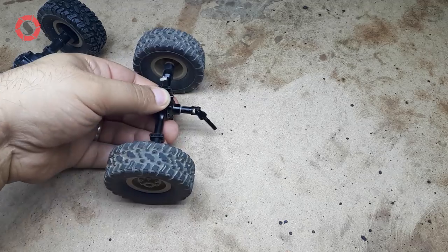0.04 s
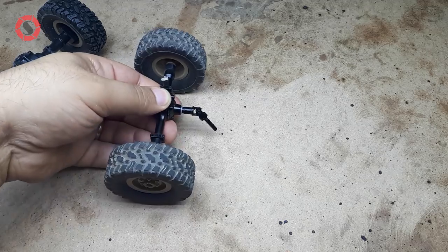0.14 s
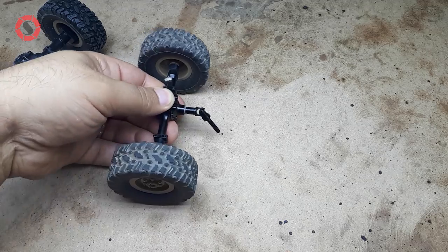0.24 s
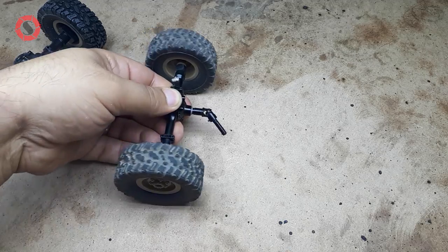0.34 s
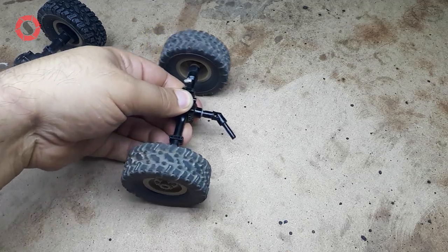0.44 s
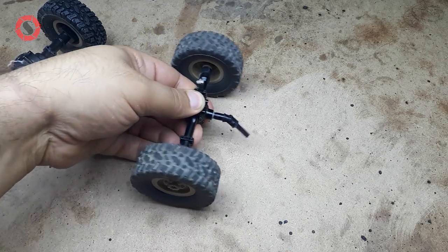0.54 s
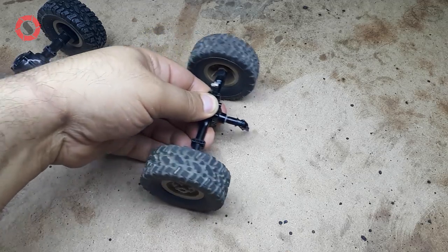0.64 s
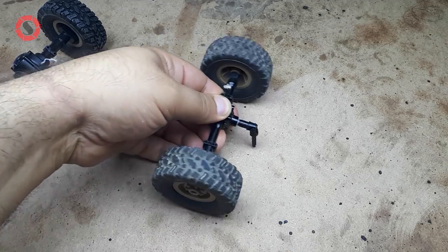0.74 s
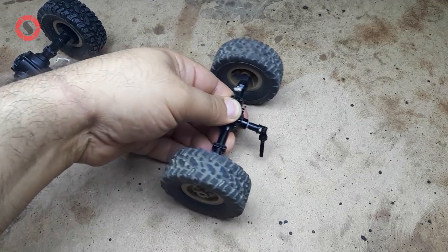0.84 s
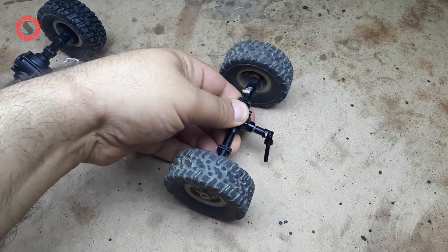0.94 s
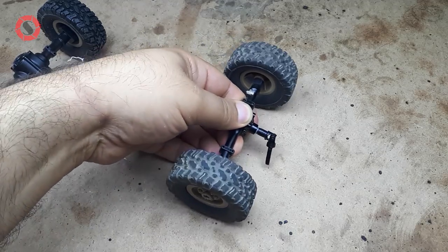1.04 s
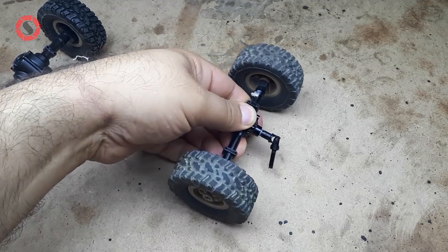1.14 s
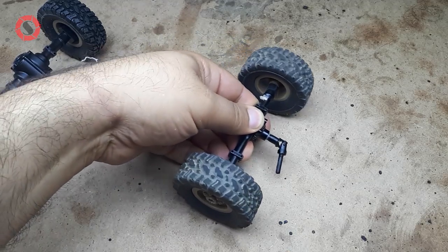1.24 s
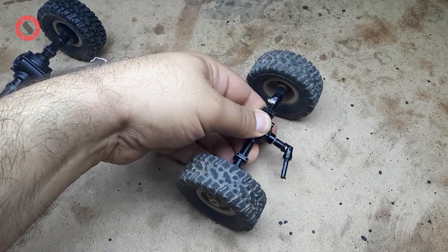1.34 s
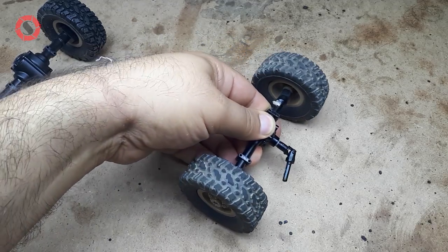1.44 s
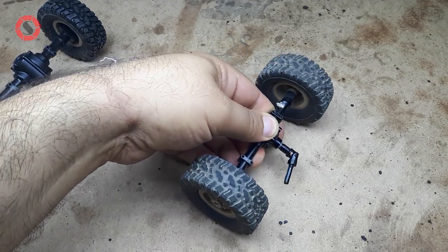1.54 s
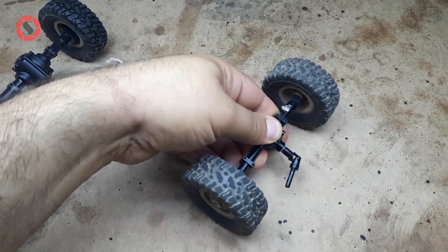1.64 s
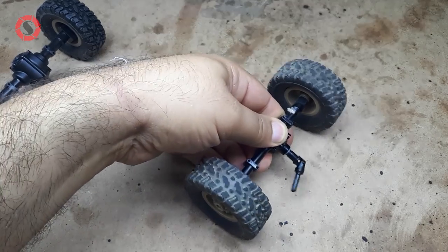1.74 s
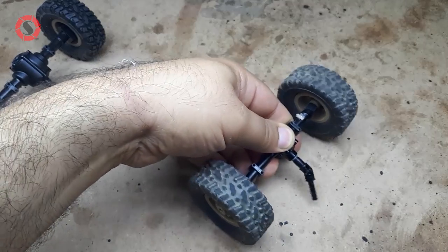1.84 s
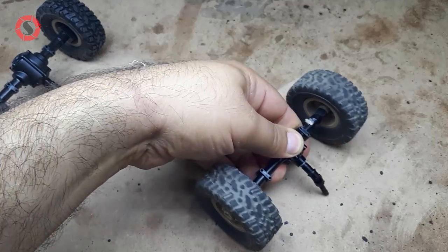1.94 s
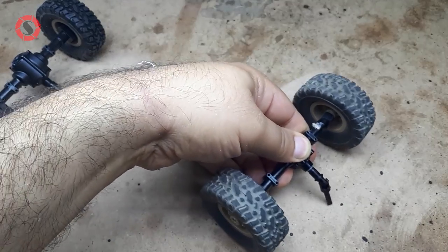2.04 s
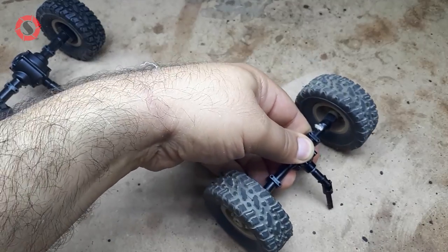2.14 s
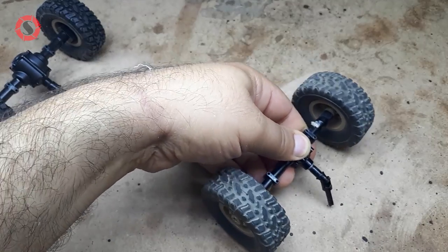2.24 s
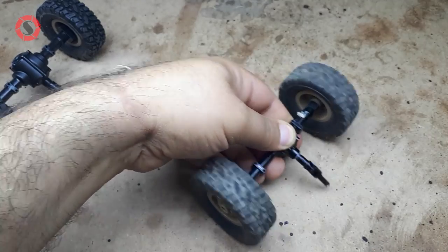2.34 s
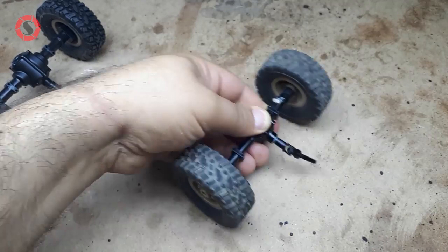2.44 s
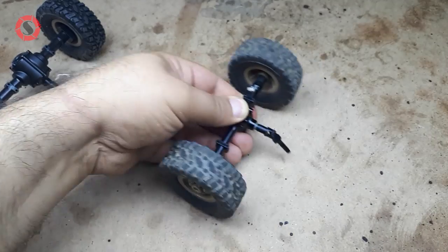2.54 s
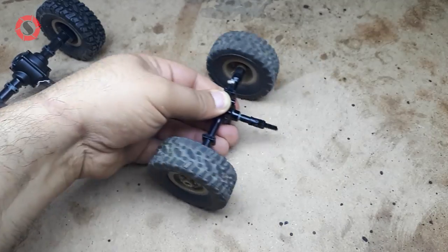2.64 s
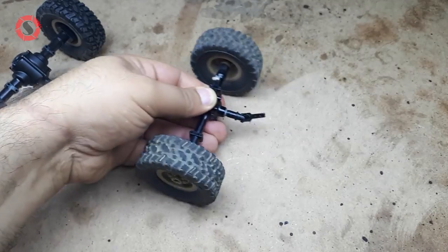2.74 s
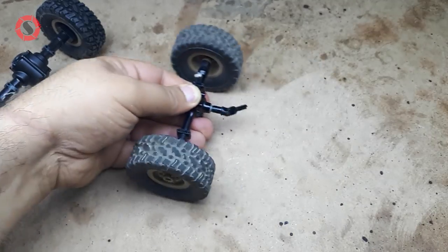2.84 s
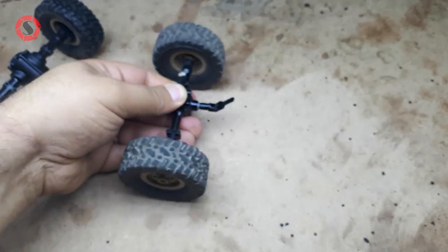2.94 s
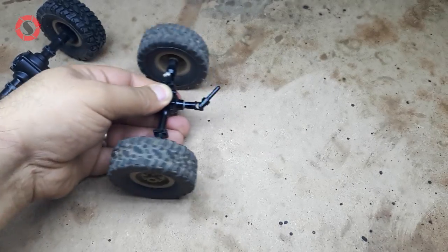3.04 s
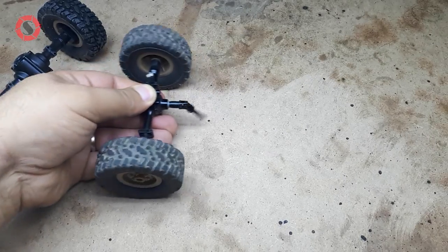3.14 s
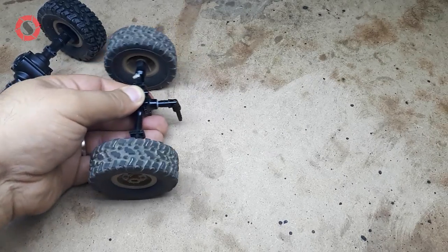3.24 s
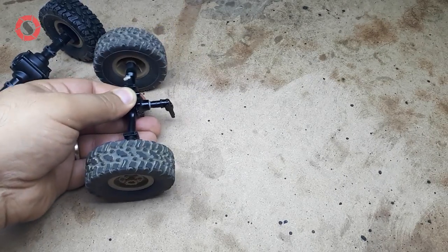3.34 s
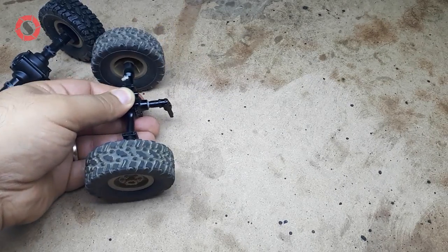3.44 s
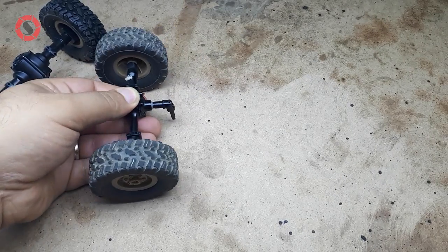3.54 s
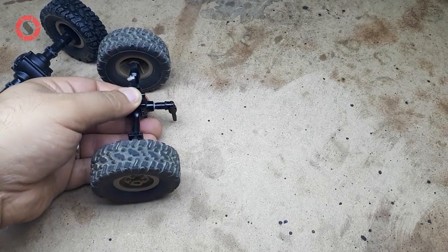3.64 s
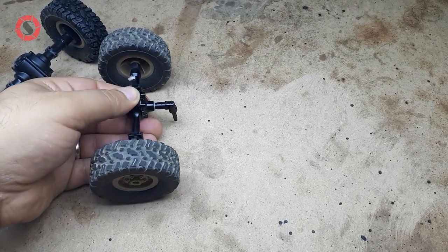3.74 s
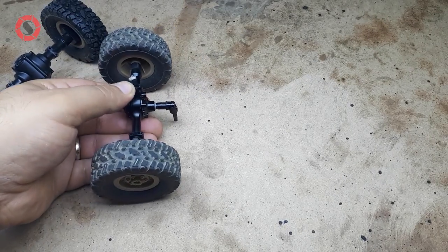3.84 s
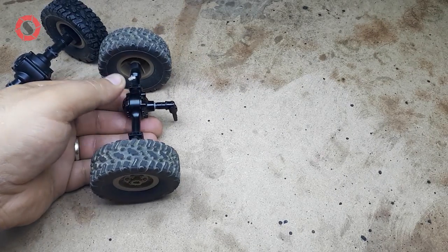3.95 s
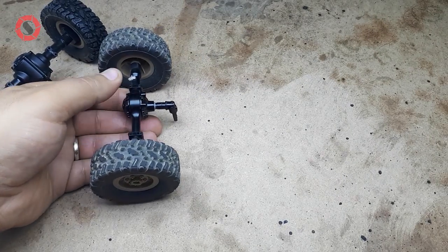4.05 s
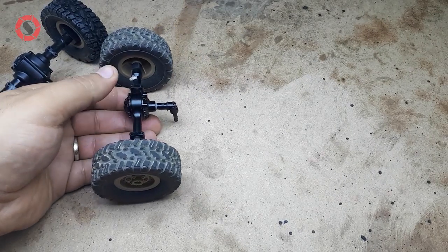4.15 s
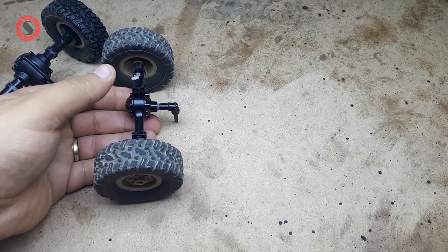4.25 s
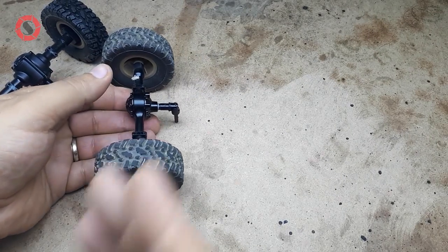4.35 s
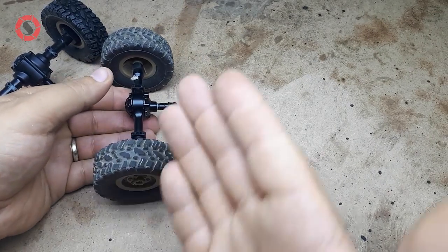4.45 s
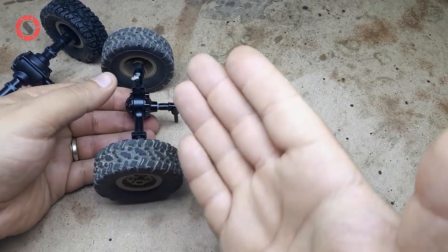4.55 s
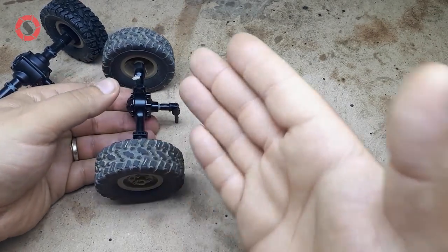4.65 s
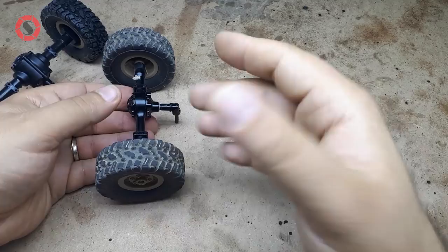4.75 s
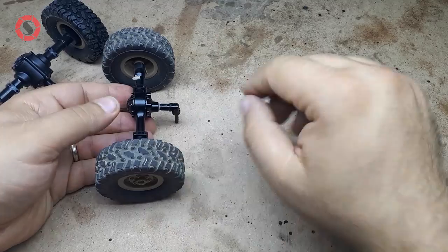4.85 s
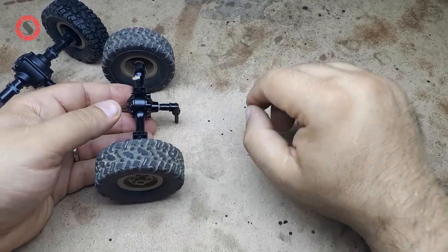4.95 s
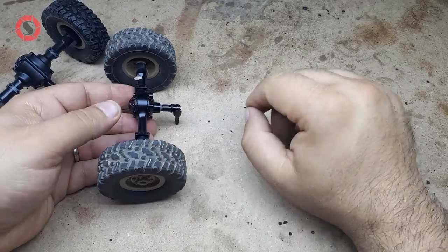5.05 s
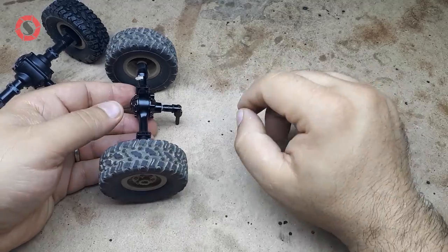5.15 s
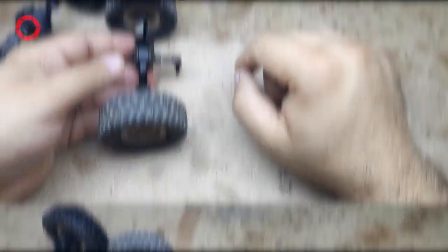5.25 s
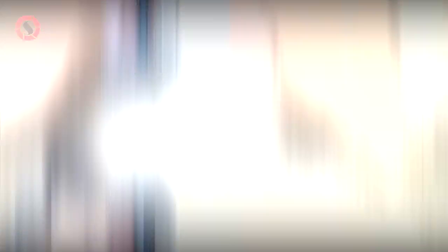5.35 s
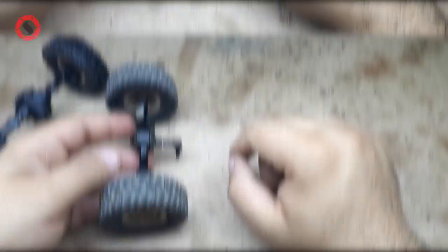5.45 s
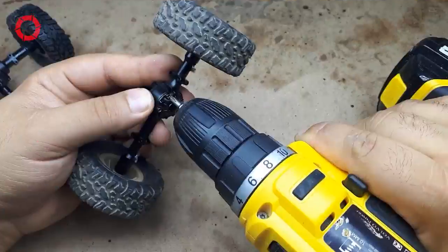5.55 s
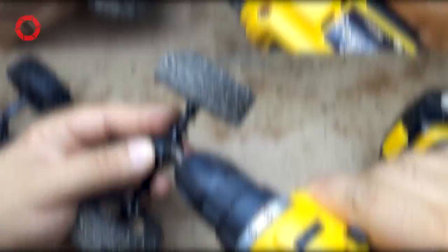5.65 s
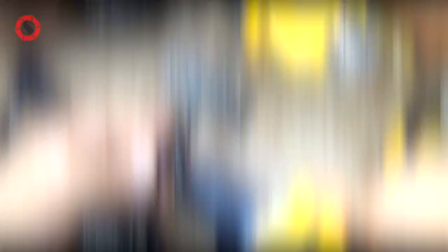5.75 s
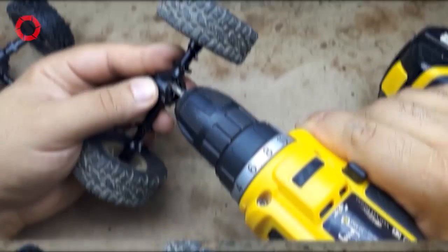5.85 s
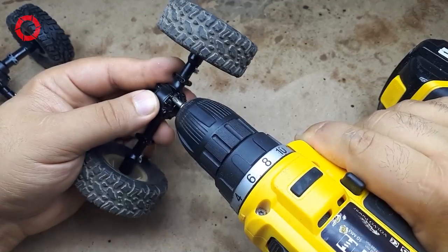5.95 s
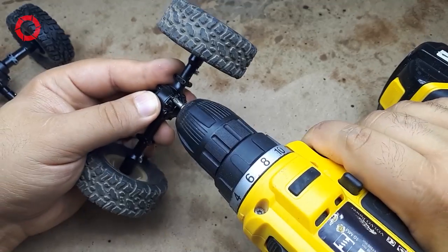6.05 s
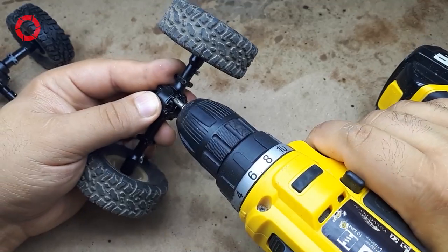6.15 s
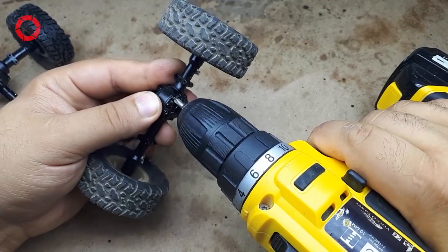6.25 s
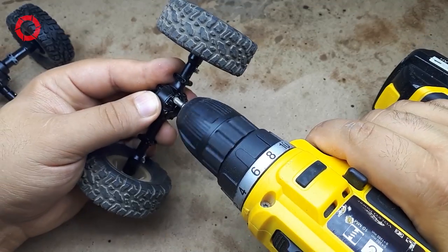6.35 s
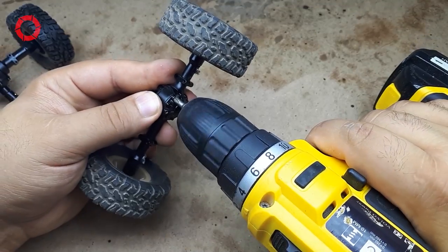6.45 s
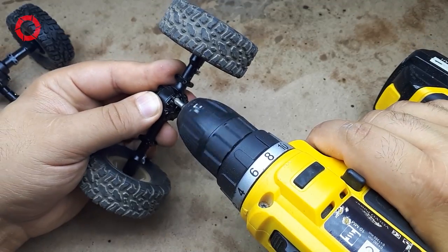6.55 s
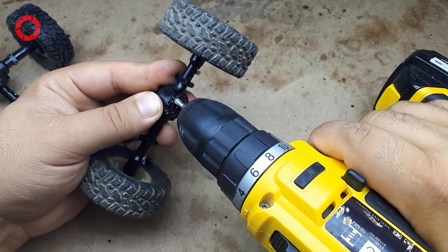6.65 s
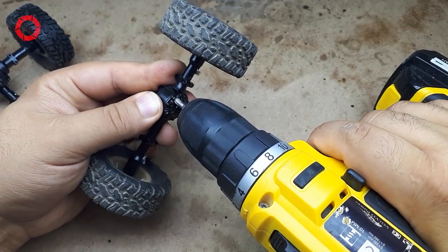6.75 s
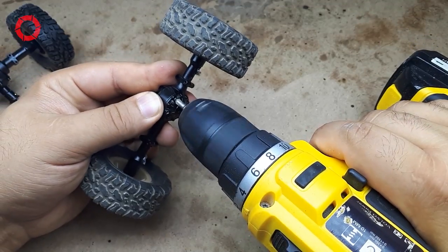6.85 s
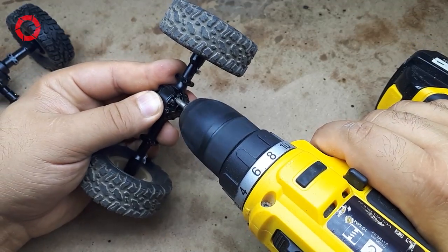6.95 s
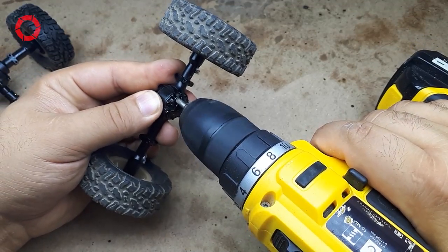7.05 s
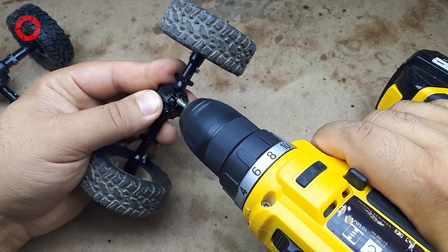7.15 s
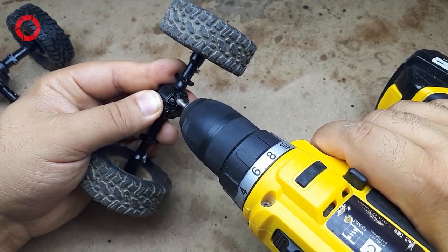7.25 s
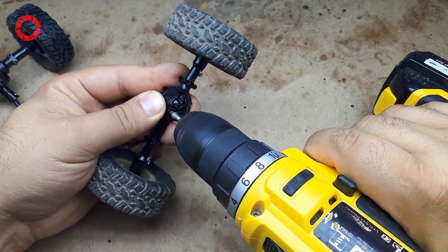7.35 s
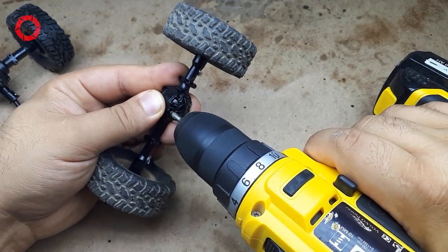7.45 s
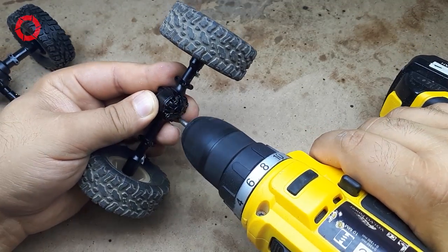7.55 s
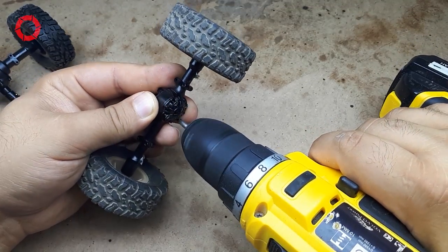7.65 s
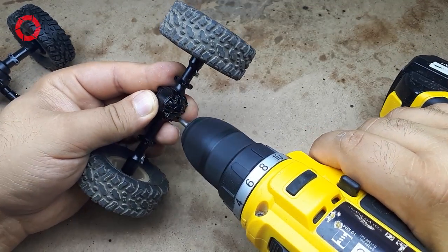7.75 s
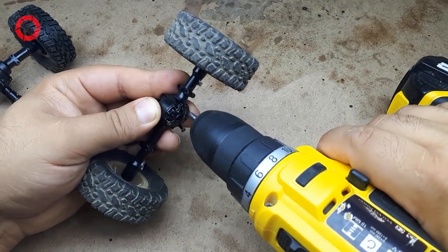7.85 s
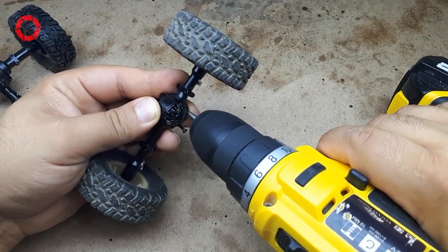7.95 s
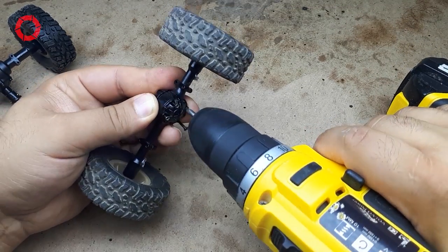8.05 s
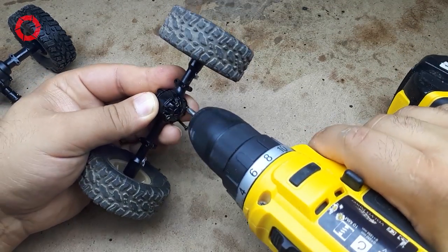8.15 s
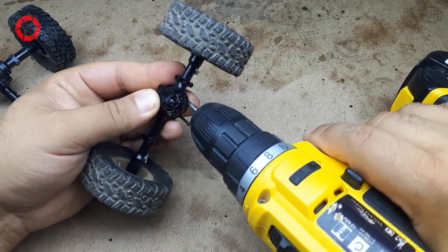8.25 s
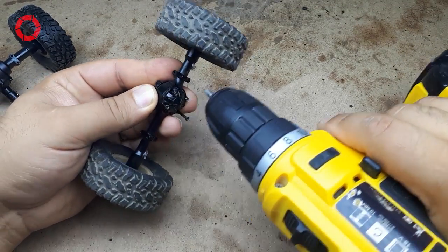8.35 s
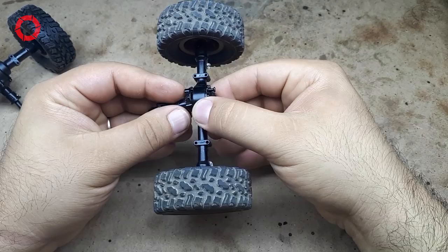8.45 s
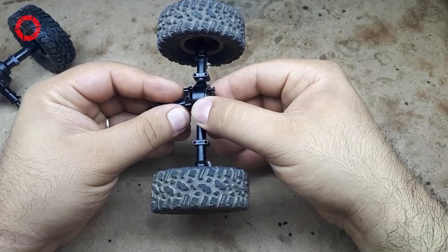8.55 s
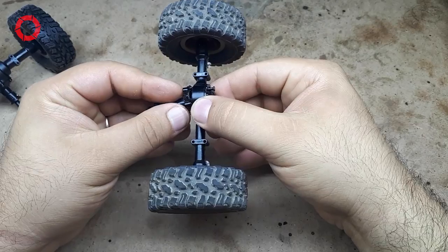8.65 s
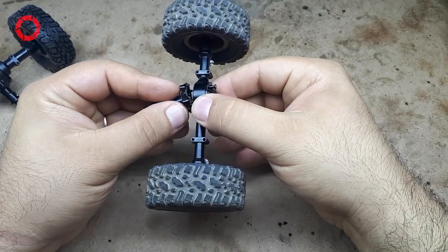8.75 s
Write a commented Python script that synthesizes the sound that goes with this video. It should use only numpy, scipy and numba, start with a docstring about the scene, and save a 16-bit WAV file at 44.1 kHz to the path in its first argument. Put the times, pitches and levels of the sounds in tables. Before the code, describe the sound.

Handled toy wheels rustle and tap quietly on a bench; later a cordless drill spins up to a high, gritty whine with abrupt pitch jumps, then stops sharply.

```python
"""A workbench in a small room, two microphones, the drill about 6 cm nearer the right one.
A hand turns a toy axle over the bench: rubber tyres scuff, parts knock, the room hums faintly.
Then a cordless drill spins the axle: its controller whistles, its whine climbs in four abruptly joined
stretches of sines on the rotor angle, gear noise bursts at each tooth contact, and the brake stops it.
Scuffs are grainy filtered noise, knocks are struck decaying modes, the background is shaped noise."""
import sys
import numpy as np
from scipy import signal
from scipy.fft import rfft, irfft, next_fast_len
from scipy.io import wavfile
from scipy.ndimage import uniform_filter1d
from numba import njit

SR = 44100
rng = np.random.default_rng(int(sys.argv[2]) if len(sys.argv) > 2 else 0)


def wrap_up_sound(samples):
    """Save the sound to the file named by the first command line argument, as 16-bit audio."""
    columns = np.atleast_2d(samples).T
    # keep every value between -1 and 1, then stretch to whole-number steps
    tamed = np.clip(columns, -1, 1)
    steps = np.round(tamed * 32767).astype(np.int16)
    wavfile.write(sys.argv[1], SR, steps)


N = 388060
T = np.arange(N) / SR  # s


# slow squeeze of the trigger: t/s, rotor speed f/(turns a second)
CREEP = [(6.15, 30), (6.6, 60), (6.77, 130.5), (6.82, 197.8), (6.89, 311.3), (6.941, 390.6), (6.992, 437.3)]
# stretches of rising pitch that close in on a top value: t/s, from f/(turns a second),
# toward f/(turns a second), time constant/s
STRETCHES = [(6.992, 437.3, 600, .245), (7.3505, 574, 661, .131), (7.6175, 585, 650, .1),
             (7.8575, 425, 580, .17)]
BRAKE_S, BRAKE_LENGTH_S = 8.1185, .081
BRAKE_HZ, BRAKE_DROP_HZ, BRAKE_POWER = 420, 130, 1.5  # turns a second at the brake, and their fall


def speed():
    """Turns a second through creep, rising stretches and brake; also the progress of the brake, 0 to 1."""
    hz = np.interp(T, *np.transpose(CREEP))
    for s, start, top, tau in STRETCHES:
        rising = top - (top - start) * np.exp(-np.abs(T - s) / tau)
        hz = np.where(T >= s, rising, hz)
    braked = np.clip((T - BRAKE_S) / BRAKE_LENGTH_S, 0, 1)
    braking_hz = BRAKE_HZ - BRAKE_DROP_HZ * braked ** BRAKE_POWER
    return np.where(braked > 0, braking_hz, hz), braked


# the body resonates with the rotor, so the whine depends on speed: f/(turns a second), level/dB before the mix
WHINE = [(130, -150), (198, -82), (274, -75), (311, -50), (468, -42), (530, -30.5), (566, -32.5),
         (575, -26.5), (600, -26.5), (612, -30.5), (624, -27.5), (636, -30), (643, -40)]
BRAKE_WHINE_DB = -1


def rotor_whine(hz, braked, turns):
    """One sine a turn, its level set by the body resonance and fading as the brake bites."""
    level_db = np.interp(hz, *np.transpose(WHINE)) + BRAKE_WHINE_DB * (braked > 0) + 0.6 * walk(76)
    return np.sqrt(2) * undb(level_db) * (1 - braked ** 4) * np.sin(2 * np.pi * turns)


# commutator lines: multiple of the turn rate, relative level/dB at 600 turns a second,
# change/dB per 100 turns a second
ROTOR = [(2, -21, -5), (3, -12, 0), (4, -22, 3), (5, -24, -3), (6, -19, 9), (7, -23, 1), (8, -18, 4),
         (9, -16, 5), (10, -15, 9), (11, -15, 9), (12, -14, 9), (13, -20, -1), (15, -24, 8), (16, -17, 15),
         (17, -24, 8), (18, -18, 13)]
# gear lines: multiple of the mesh rate, relative level/dB at 600 turns a second,
# change/dB per 100 turns a second
MESH = [(1, -12, 2), (1.5, -22, -3), (2, -19, -1), (3, -24, -1), (4, -16, -5), (5, -23, -3), (6, -17, -1),
        (7.85, -21, -3), (8, -21, -3)]
# uneven teeth blur some lines into bands of noise: multiple of the mesh rate, width as a share,
# relative level/dB
MESH_BANDS = [(4, .05, -21), (6, .07, -16), (7.9, .06, -16)]
MESH_PER_TURN, TURNS_PER_CHUCK_TURN = 1.557, 40
CASE_HZ, CASE_WIDTH_HZ, CASE_DB = 3450, 500, 5  # resonance that lifts lines passing through it
BRAKE_LINES_DB = -5


def rotor_and_mesh_lines(hz, braked, turns):
    """Commutator and gear teeth sound at multiples of the turn rate, each wavering on its own."""
    orders = [*ROTOR, *((k * MESH_PER_TURN, db, slope) for k, db, slope in MESH)]
    lines = 0
    for k, db, slope in orders:
        gain = undb(db + 3.2 * walk(22) + slope * (hz / 100 - 6))
        # low orders come in first as the rotor speeds up
        entry = np.clip((hz - 140 - 35 * min(k, 6)) / 60, 0, 1)
        lines = lines + gain * entry * np.sin(2 * np.pi * k * (turns + .007 * walk(70)))
    blur = 0
    for k, width, db in MESH_BANDS:
        band = unit(sweep(rng.standard_normal(N), k * MESH_PER_TURN * hz, width))
        blur = blur + undb(db + 1.9 * walk(15)) * band
    lines = np.sqrt(2) * lines + blur * np.clip(hz / 100 - 2.5, 0, 1)
    lines = lines * undb(BRAKE_LINES_DB * (braked > 0))
    lines = lines + undb(CASE_DB) * peak(lines, CASE_HZ, CASE_WIDTH_HZ)
    # the lowest mesh line throbs once a chuck turn
    lowest = peak(lines, 900, 190)
    return lines + 2.6 * lowest * np.cos(2 * np.pi * turns / TURNS_PER_CHUCK_TURN)


# colour of the housing: f/Hz, density/dB per Hz before the treble and creep lifts
HOUSING = [(120, -35), (200, -29), (330, -25), (600, -9), (780, -14.5), (950, -13.5), (1140, -14.5),
           (2500, -13.5), (3490, -13), (4520, -14), (6300, -11.5), (7830, -15), (8500, -30), (10800, -11),
           (12300, -22), (16000, -24)]
TREBLE_DB, TREBLE_DB_PER_100_TURNS, TREBLE_WANDER_DB = 2.5, -1.5, -0.5


def gear_rattle(hz, contact):
    """Grainy noise comes in a burst at every tooth contact and takes the colour of the housing."""
    teeth = 1 + 0.88 * np.exp(-(contact % 1) / 0.14)
    grit = spread(grains(2.9), grains(0.95), 0.83)
    rattle = unit(colour(grit * teeth, HOUSING)) * undb(1.6 * walk(25))
    by_speed_db = TREBLE_DB_PER_100_TURNS * np.clip(hz / 100 - 5.5, -1, 1)
    treble_db = TREBLE_DB + by_speed_db + TREBLE_WANDER_DB * walk(15)
    rattle = rattle + highpass(rattle, 8200, 6) * (undb(treble_db) - 1)
    # at a creep the brushes scrape in a lower band
    return rattle + undb(8.0) * peak(rattle, 2900, 1200) * np.clip(1 - hz / 350, 0, 1)


# housing resonances: f/Hz, width/Hz of each of two passes, level/dB against one another
GROWL = [(560, 140, -5), (670, 150, 0), (930, 350, -7)]
# the growl gives way as the rotor gathers speed: f/(turns a second), relative level/dB before a trim
GROWL_BY_SPEED = [(31, -5), (36, 6), (60, 4.5), (130, 4.5), (311, -6.5), (460, -17), (650, -12.5)]
GROWL_WANDER_DB = 2.5


def gear_growl(hz, contact):
    """Tooth contacts of uneven size beat on the low resonances of the housing."""
    size = undb(3 * rng.standard_normal(N // 20))[contact.astype(int)]
    beat = grains(0.4) * (0.12 + size * np.exp(-(contact % 1) / 0.15))
    growl = unit(sum(undb(db) * peak(peak(beat, f, w), f, w) for f, w, db in GROWL))
    wander_db = GROWL_WANDER_DB * walk(20) * np.clip(hz / 450, 0, 1)
    return undb(np.interp(hz, *np.transpose(GROWL_BY_SPEED)) + wander_db + 1.5) * growl


# load on the gears: t/s, level/dB before the trims of lines, rattle and growl
LOAD = [(6.15, -77), (6.188, -64.5), (6.306, -61), (6.448, -64), (6.79, -47.5), (6.89, -35), (7.024, -33.5),
        (7.84, -32.5), (7.857, -36), (7.87, -33.5), (8.098, -34.5), (8.18, -36), (8.19, -73.5)]
PHASE_JUMP_TURN = .3  # the tone's phase jumps by this share of a turn at each abrupt join of the pitch


def drill():
    """One running phase drives the whine, the commutator and gear lines, and the gear noise."""
    hz, braked = speed()
    join_times = [stretch[0] for stretch in STRETCHES[1:]] + [BRAKE_S]
    turns = np.cumsum(hz) / SR + PHASE_JUMP_TURN * np.searchsorted(join_times, T)
    contact = turns * MESH_PER_TURN
    load_db, = curves([LOAD], -150)
    whine = rotor_whine(hz, braked, turns)
    lines = undb(load_db - 6.0) * rotor_and_mesh_lines(hz, braked, turns)
    gears = undb(load_db) * (undb(1.5) * gear_rattle(hz, contact) + gear_growl(hz, contact))
    return whine, lines, gears


# controller steps: t/s, chopping f/Hz, level/dB before the mix
CHOP = [(6.149, 3407, -47), (6.203, 3542, -51), (6.337, 3410, -48), (6.588, 3525, -48), (6.608, 3404, -58),
        (6.624, 3566, -47.5), (6.82, 3530, -50.5), (6.92, 3460, -100)]
# its overtones: multiple of the chopping rate, level/dB against the fundamental
CHOP_OVER = [(2, -10), (3, -23), (4, -14)]


def controller():
    """The speed controller chops the current and whistles; its rate steps as the trigger moves."""
    s, hz, db = np.transpose(CHOP)
    step = np.clip(np.searchsorted(s, T) - 1, 0, None)
    phase = np.cumsum(hz[step]) / SR
    tone = 0
    for k, partial_db in [(1, 0.0096), *CHOP_OVER]:
        gain = undb(partial_db + 1.5 * walk(46))
        tone = tone + gain * np.sin(2 * np.pi * (k * phase + .04 * walk(150)))
    return np.sqrt(2) * tone * undb(np.interp(T, s, db, left=-150))


# low clicks at two of the abrupt joins: t/s, level/dB before a 9.5 dB lift
LOW_CLICKS = [(7.35, -42.5), (7.618, -41.5)]


def low_clicks():
    """Each low click is a sudden step of the waveform that dies away within a few milliseconds."""
    return sum(undb(db + 9.5) * (T > s) * np.exp(-np.abs(T - s) / 0.00061) for s, db in LOW_CLICKS)


# trigger, clutch and brake clicks: t/s, peak level/dB before the mix, colour f/Hz, t60/s before filtering
CLICKS = [(6.031, -58, 2200, 0.024), (6.071, -53, 6200, 0.022), (6.148, -45, 3660, 0.044),
          (6.177, -31, 3030, 0.016), (6.283, -35.5, 680, 0.19), (6.319, -35, 666, 0.011),
          (8.151, -27.5, 889, 0.026), (8.175, -25, 610, 0.061), (8.21, -57, 697, 0.034),
          (8.319, -55, 2000, 0.045), (8.759, -70, 800, 0.03)]


def clicks():
    """Short noise bursts, each coloured by the part that snaps."""
    out, t = np.zeros(N + SR), np.arange(SR // 8) / SR
    for (s, db, hz, t60), noise in zip(CLICKS, rng.standard_normal((len(CLICKS), len(t)))):
        burst = noise * np.exp(-np.log(1000) * t / t60)
        burst = peak(burst, hz, 0.15 * hz) + 0.1 * peak(burst, 1330, 2200)
        start = int(s * SR)
        out[start:start + len(t)] += undb(db) * burst / np.abs(burst).max()
    return out[:N]


# tyres and fingers scuffing: loudest from t/s, held/s, level/dB before the mix, dull part/dB against it,
# hiss/dB against it, resonance centre f/Hz
SCUFFS = [(0.1, .005, -77, 7, -9, 1460), (0.489, 0.021, -58, -7.5, -0.5, 2040),
          (0.676, 0.019, -58.5, -15, -1, 2460), (0.809, 0.0045, -68, -3, 3.5, 1880),
          (0.968, 0.0085, -64.5, -2.5, 1, 2120), (1.109, 0.0067, -64, -2, 0, 1590),
          (1.27, 0.0091, -66.5, 6, 1.5, 1820), (1.36, .01, -70, 2, 4.5, 1660),
          (1.48, 0.056, -78, 3, 4.5, 2180), (1.66, 0.012, -58, -3.5, -5, 1750),
          (1.711, 0.003, -64.5, -2.2, .6, 2220), (1.833, 0.0035, -61, 0, 0.3, 1870),
          (1.91, 0.011, -74, 5, .1, 1560), (2.065, .01, -74.5, 2.2, -9, 1680),
          (2.506, .04, -54.5, -2, -1.2, 1270), (2.55, 0.039, -58, -5.5, -5, 1500),
          (2.628, 0.017, -51, -15.5, -3, 2100), (2.7, 0.053, -72, -13, 6, 2000),
          (2.81, 0.031, -65.5, -8, 5, 2210), (2.903, 0.0082, -57, -10, 3, 2160),
          (2.95, 0.064, -65.5, -10, 2.5, 1890), (3.15, 0.034, -63, -10, 2, 2310),
          (3.229, 0.037, -55, -12.5, -4, 1940), (3.3, 0.04, -61, -6, -0.5, 1660),
          (3.91, 0.13, -77.5, -1.2, -10.5, 1700), (4.09, .01, -71, -2.2, -8, 1790),
          (5.09, 0.017, -67.5, 2, -25, 2600), (5.15, .02, -70, -3, -9, 2550),
          (5.23, 0.011, -73, -3, -11, 1870), (5.46, 0.0083, -56, -13, -26, 1860),
          (5.49, 0.032, -68, -10, 1, 1890), (5.58, 0.013, -74, -14, 8, 1670),
          (5.79, .003, -76, 19.5, -6, 1910)]
# three spells of faint rustle of the grip under the scuffs: t/s, level/dB before the mix, hiss/dB against it
GRIP = [
    [(0, -88, -8), (.4, -86, -1), (.6, -78, 5), (1.7, -81.5, 1.2), (2.1, -100, -5)],
    [(2.3, -94, -7), (2.5, -82, -11), (2.68, -73, 8), (3.3, -71.5, 6.5), (3.45, -76.5, -4),
     (4.0, -82.5, -12), (4.3, -86, -6)],
    [(4.93, -80, -2.2), (5.6, -72.5, 0.5), (5.65, -87, -4), (5.9, -89, -5)],
]
GRIP_DULL_DB, GRIP_HZ = -1.5, 1740
SCUFF_RISE_DB_S, SCUFF_FALL_DB_S = 591, 416  # dB a second


def strokes():
    """Each scuff rises, holds and falls; the louder one of the moment sets the colour."""
    grip_db, grip_hiss_db = curves(GRIP, -150)
    power = undb(2 * (grip_db + 1.9 * walk(18)))
    mix = power * np.array([GRIP_DULL_DB + 0 * T, grip_hiss_db, GRIP_HZ + 0 * T])
    for s, held, db, *tone in SCUFFS:
        rise_db = SCUFF_RISE_DB_S * np.clip(s - T, 0, 1)
        fall_db = SCUFF_FALL_DB_S * np.clip(T - s - held, 0, 1)
        scuff_power = undb(2 * (db - rise_db - fall_db))
        power = power + scuff_power
        mix = mix + scuff_power * np.array(tone)[:, None]
    return np.sqrt(power), *(mix / power)


# colour of the rubber: f/Hz, density/dB per Hz
RUBBER = [(590, -14), (1000, -26), (1200, -4), (1370, 4.5), (1980, 1), (2150, 4), (3500, -7), (7020, -11),
          (8360, -23), (12700, -22), (16000, -23.5)]
SCUFF_SWAY_DB = 1.5  # left minus right


def scuffs():
    """Tread blocks and skin slip in dense grains: rasp, a moving plastic resonance, hiss, dull tyre body."""
    gain, dull_db, hiss_db, hz = strokes()
    slip = spread(grains(3.5), grains(2.3), 0.93) * undb(2.0 * walk(60))
    rasp = unit(colour(slip, RUBBER))
    hiss = highpass(rasp, 3000)
    low = rasp - hiss
    plastic = unit(np.array([sweep(x, hz * (1 + 0.06 * walk(30)), 0.29) for x in slip]))
    plastic = plastic * undb(-10 + 2.5 * walk(12))
    dull = unit(peak(peak(slip, 780, 510), 780, 510))
    hiss = hiss + undb(-2) * peak(hiss, 4450, 300) + undb(-2) * peak(hiss, 6900, 600)
    layers = low + plastic + undb(hiss_db) * unit(hiss) + undb(dull_db) * dull
    return pan(gain * layers, 0.46 + SCUFF_SWAY_DB * walk(4.3))


# knocks on the bench: t/s, energy of the blow/dB before the mix, board, frame and high ring/dB against it,
# left minus right/dB, rattle time constant/s
KNOCKS = [(0.0977, -64.5, -35, -28, -29, 8, 0.023), (5.056, -44.5, -11.5, -20, -36, -8.5, 0.031),
          (5.0642, -50, -14.5, -11.5, -2, 11.5, 0.04), (5.2406, -42, -20, -28, -14, 5, 0.042),
          (5.4172, -44.5, -13, -23, 2, -6, 0.043), (5.4327, -40, -20, -38, -19, 14.5, 0.01),
          (5.783, -53, -28, -29, -20, -1, 0.0078), (5.79, -53, -12.5, -25, -35, 3, 0.0072),
          (5.801, -82, -18, -20, -27, 5, 0.016)]
# modes of the part, the bench board, the bench frame, and the part's high ring: f/Hz, level/dB, t60/s
PART = [(1700, -3, .02), (1835, 0, .055), (2050, -4, .02)]
BENCH = [(562, 10, 0.023), (792, 6.5, 0.042), (1170, 13, 0.008)]
FRAME = [(279, 8.5, 0.2), (166, -19, 0.11)]
PART_HIGH = [(2420, -4, .03), (2690, 0, .065), (3900, -5, .005), (5100, -6, .005)]


def knocks():
    """A rough, rattling blow rings the part and thuds in the bench."""
    blows = np.zeros((4, 2, N))  # one pair of channels for each set of modes
    t = np.arange(SR // 5) / SR
    noises = rng.standard_normal((len(KNOCKS), len(t)))
    for (s, db, *rel_db, pan_db, rattle_s), noise in zip(KNOCKS, noises):
        fade = np.exp(-t / 0.003) + 0.29 * np.exp(-t / rattle_s)
        blow = noise * fade * np.minimum(t / 0.0013, 1)
        blow = pan(blow, pan_db * np.ones(1)) * undb(db) / np.sqrt(np.sum(blow ** 2))
        start = int(s * SR)
        blows[:, :, start:start + len(t)] += blow * undb([0] + rel_db)[:, None, None]
    return sum(ring(blow, modes) for blow, modes in zip(blows, [PART, BENCH, FRAME, PART_HIGH]))


# short squeaks: t/s, length/s, mean pitch f/Hz, level/dB before the mix, octave/dB against it
SQUEAKS = [(1.023, 0.2, 760, -74, -1), (3.785, 0.14, 757, -86, 9)]
SQUEAK_FADE_S = .02


def squeak():
    """Brief rubbing tones, unsteady in pitch, with their octave."""
    wobble = np.cumsum(1 + 0.02 * walk(80)) / SR
    out = 0
    for s, length, hz, db, octave_db in SQUEAKS:
        fade = np.clip(np.minimum(T - s, s + length - T) / SQUEAK_FADE_S, 0, 1)
        tone = np.sin(2 * np.pi * hz * wobble) + undb(octave_db) * np.sin(4 * np.pi * hz * wobble)
        out = out + fade * undb(db + 2.0 * walk(26)) * tone
    return out


ROOM_T60_S = 0.23


def room(x):
    """A small room: a different decaying noise response for each channel, shared in the bass."""
    t = np.arange(SR // 2) / SR
    mid, side = rng.standard_normal((2, len(t))) * np.exp(-np.log(1000) * t / ROOM_T60_S) * (t > .004)
    side = highpass(side, 900)
    tail = np.array([mid + side, mid - side])
    tail = tail / np.sqrt(np.mean(np.sum(tail ** 2, axis=1)))
    return signal.fftconvolve(x, tail, axes=1)[:, :N]


# colours of the background, first the fuller then the quieter: f/Hz, density/dB per Hz before levelling
AIR = [(12, -36), (20, -6), (88, -1.5), (168, -20.5), (198, -7.5), (228, -14), (337, -10.5), (422, -18.5),
       (642, -15.5), (738, -21), (1150, -21), (1960, -27.5), (16000, -33.5)]
HUSH = [(12, -48), (20, -15.5), (86, 0.5), (163, -11), (198, 5.5), (234, -25), (270, -10), (367, -17.5),
        (802, -19), (2820, -27.5), (16000, -35.5)]
HUSH_FROM_S, HUM_DROP_DB = 5.99, -14
# room hum: f/Hz, level/dB until the drop
HUM = [(96.9, -86.5), (193.8, -77)]
# rumble: t/s, level/dB before swells and wander
RUMBLE = [(0, -73), (1.8, -67.5), (2.1, -67), (3.7, -68.5), (4.0, -69.5), (5.98, -71.5), (6.0, -82),
          (6.2, -88), (6.6, -76.5), (8.8, -79)]
# brief swells of the rumble: t/s, peak level/dB added to the rumble's gain
SWELLS = [(1.04, -60), (2.23, -73), (2.42, -60), (2.95, -65), (3.5, -69), (3.67, -82), (5.4, -67),
          (6.4, -62)]
RUMBLE_WANDER_DB, SWELL_DB_S = 2.5, 216  # dB, dB a second


def background():
    """Hiss and low wash from shaped noise, a hum of sines and a swelling rumble; all drop near 6 s."""
    late = T > HUSH_FROM_S
    mid, side = rng.standard_normal((2, N))
    side = side - .62 * signal.sosfilt(signal.butter(1, 600, fs=SR, output="sos"), side)
    noise = np.array([mid + side, mid - side])
    air = undb(-70.5) * unit(colour(noise, AIR))
    hush = undb(-79) * unit(colour(noise, HUSH))
    wash = np.where(late, hush, air)
    hum = sum(np.sqrt(2) * undb(db + 1.4 * walk(6.7)) * np.sin(2 * np.pi * hz * T) for hz, db in HUM)
    level = undb(np.interp(T, *np.transpose(RUMBLE)) + RUMBLE_WANDER_DB * walk(8.9))
    level = level + sum(undb(db - SWELL_DB_S * np.abs(T - s)) for s, db in SWELLS)
    shake = rng.standard_normal(N) + 0.52 * rng.standard_normal((2, N))
    rumble = unit(peak(peak(shake, 97, 55), 97, 55)) * level
    return wash + hum * undb(HUM_DROP_DB * late) + pan(rumble, np.array([1.2]))


def undb(db):
    """dB to gain."""
    return 10 ** (np.asarray(db) / 20)


def unit(x):
    """Scale to rms 1."""
    return x / np.sqrt(np.mean(x ** 2))


def curves(tables, edge_db):
    """Columns of tables laid end to end; the first column takes edge_db outside them."""
    s, *cols = np.vstack(tables).T
    inside = sum((T >= t[0][0]) & (T <= t[-1][0] + .0015) for t in tables) > 0
    cols = [np.interp(T, s, c) for c in cols]
    return [np.where(inside, cols[0], edge_db)] + cols[1:]


def colour(x, points, share=1):
    """Shape by a share of (Hz, dB) points on a log-frequency axis."""
    n = next_fast_len(N)
    hz, db = np.transpose(points)
    bins_hz = np.arange(n // 2 + 1) * SR / n
    gain = undb(share * np.interp(np.log(bins_hz + 1), np.log(hz), db))
    return irfft(rfft(x, n) * gain, n)[..., :N]


def highpass(x, hz, order=2):
    """Keep what lies above hz."""
    return signal.sosfilt(signal.butter(order, hz, "high", fs=SR, output="sos"), x)


def peak(x, hz, width):
    """One resonance, gain 1 at its centre."""
    return signal.lfilter(*signal.iirpeak(hz, hz / width, SR), x)


@njit
def sweep(x, hz, width):
    """State-variable band-pass whose centre moves."""
    y, band, low = np.empty(len(x)), 0., 0.
    for i in range(len(x)):
        g = np.tan(np.pi * hz[i] / SR)
        v = (band + g * (x[i] - low)) / (1 + g * (g + width))
        band = 2 * v - band
        low = low + 2 * g * v
        y[i] = width * v
    return y


def ring(x, modes):
    """Decaying modes struck by x, each a complex one-pole resonator."""
    out = 0
    for hz, db, t60 in modes:
        pole = np.exp(2j * np.pi * hz / SR - np.log(1000) / (t60 * SR))
        out = out + undb(db) * signal.lfilter([1], [1, -pole], x).imag
    return out


def walk(rate):
    """Slow chance, spread 1, with about rate new values a second."""
    k = int(SR / rate)
    steps = np.repeat(rng.standard_normal(N // k + 1), k)
    return unit(uniform_filter1d(uniform_filter1d(steps, k), k)[:N])


def grains(spread_db):
    """Noise whose samples have uneven sizes: a few stand out as ticks."""
    size_db = spread_db * np.minimum(rng.exponential(size=N), 5)
    return unit(rng.standard_normal(N) * undb(size_db))


def spread(x, other, share):
    """Two channels that share the bass and differ by another noise in the treble."""
    side = share * highpass(other, 900)
    return np.array([x + side, x - side])


def pan(x, db):
    """Place between the channels, db being left minus right."""
    return x * undb(np.array([db / 2, -db / 2]))


# drill, left minus right before each channel takes its share: f/Hz, level/dB
LEAN = [(60, -10), (110, -6.5), (200, 2), (380, 0), (700, 1.5), (1290, -2), (2380, 0.5), (4400, -0.5),
        (8120, -8.5), (15000, 3.5)]
LAG_S = 0.00018  # about 6 cm of extra path to the left microphone


def lean(x):
    """The drill lies nearer the right microphone, so the left hears it later and duller."""
    left = colour(np.interp(T - LAG_S, T, x[0]), LEAN, 0.78)
    right = colour(x[1], LEAN, -0.091)
    return np.array([left, right])


def scene():
    """Drill and bench sounds near the microphones, their reverberation, and the background."""
    whine, lines, gears = drill()
    steady = whine + controller() + low_clicks()
    tool = gears + clicks()
    # the gear lines reach both microphones together
    near = lean(tool) + lines + scuffs() + knocks() + squeak()
    return lean([steady, steady]) + undb(-1.0) * near + undb(-8) * room(near) + background()


def record(dry):
    """The top is cut steeply at 15.8 kHz."""
    return signal.sosfilt(signal.ellip(10, .2, 80, 15800, fs=SR, output="sos"), dry)


dry = scene()
out = record(dry)
wrap_up_sound(out)
```